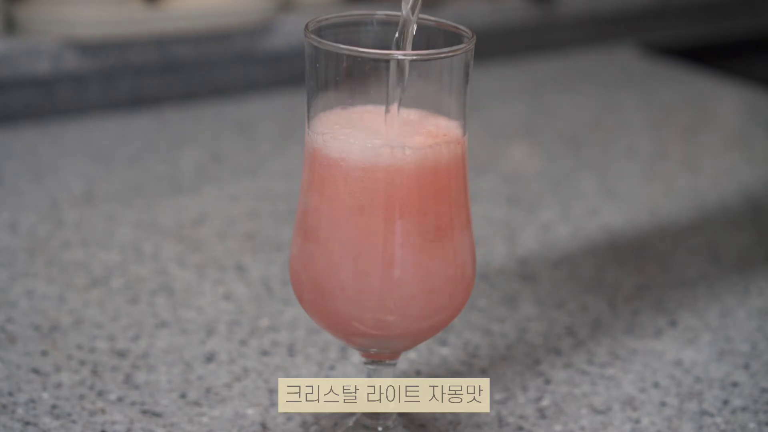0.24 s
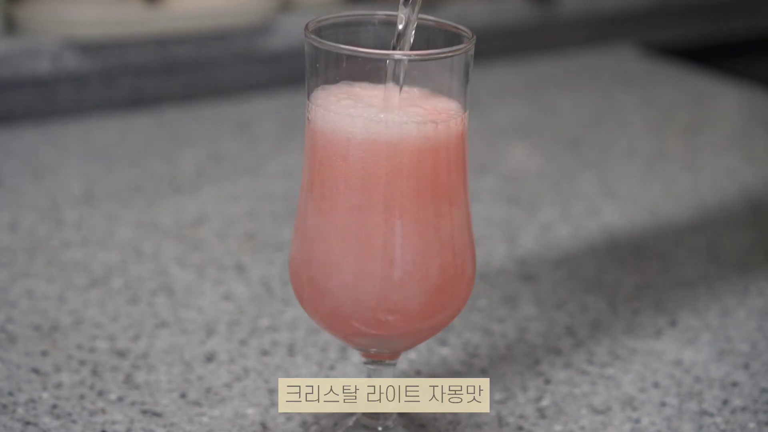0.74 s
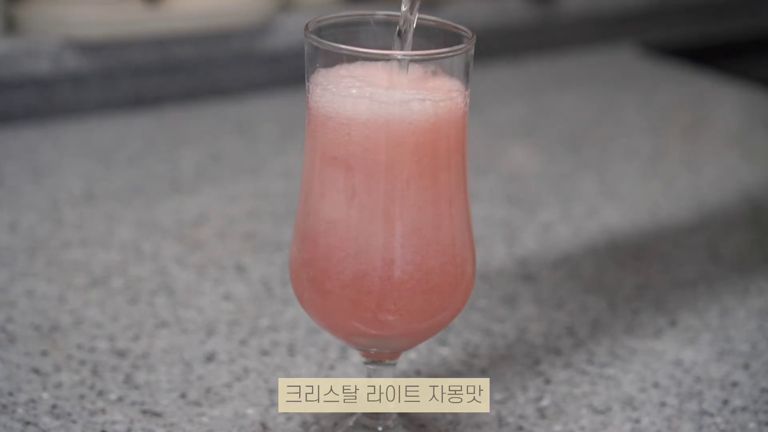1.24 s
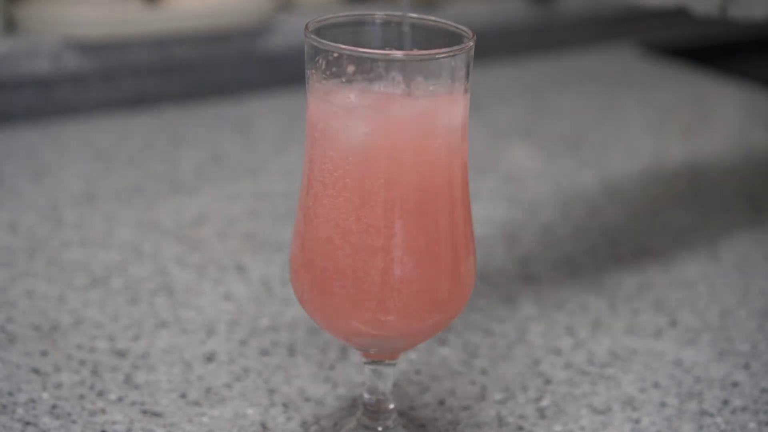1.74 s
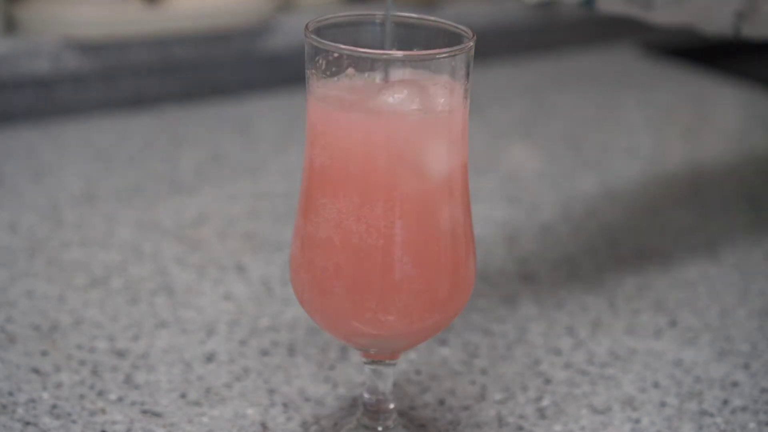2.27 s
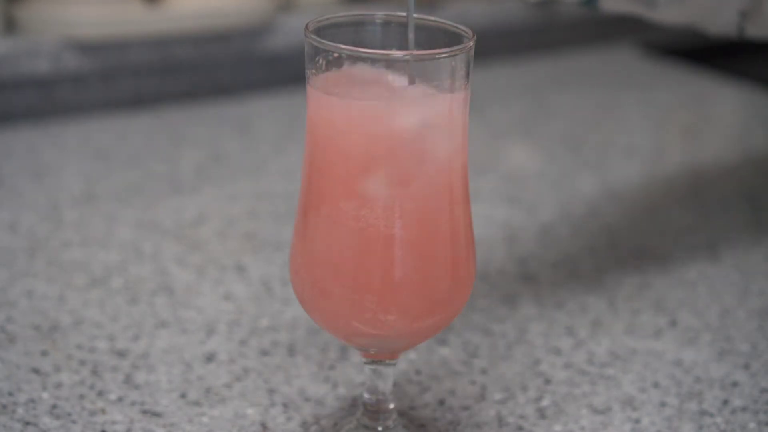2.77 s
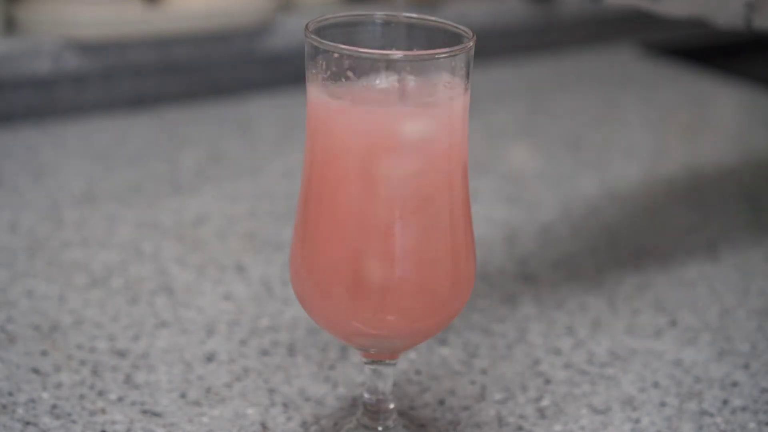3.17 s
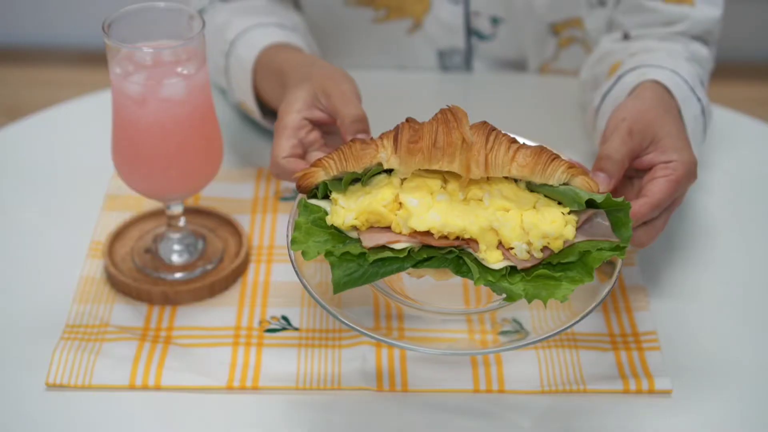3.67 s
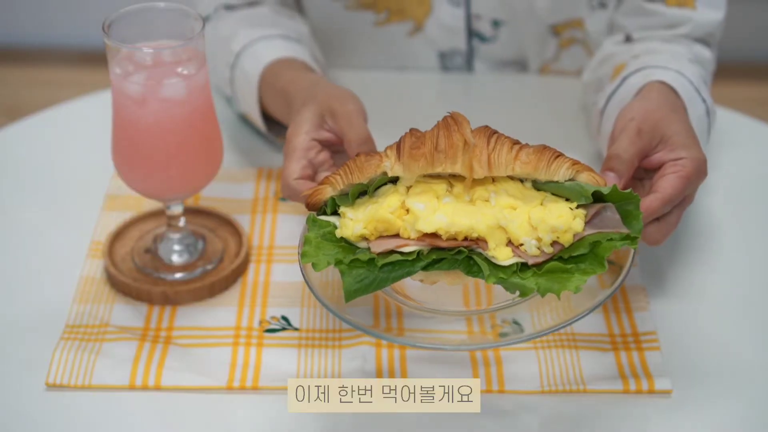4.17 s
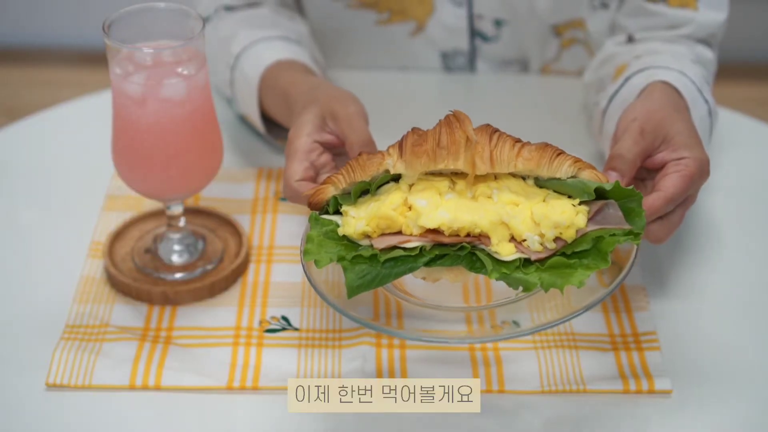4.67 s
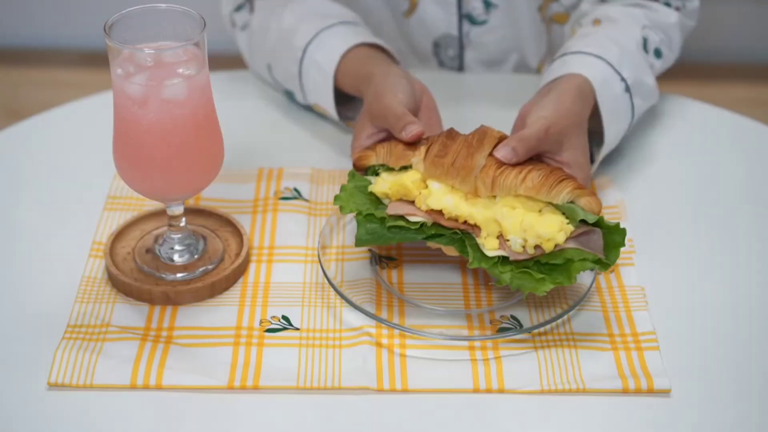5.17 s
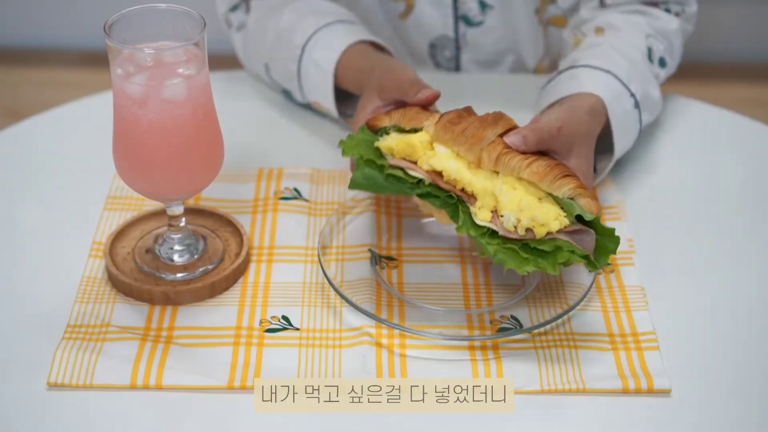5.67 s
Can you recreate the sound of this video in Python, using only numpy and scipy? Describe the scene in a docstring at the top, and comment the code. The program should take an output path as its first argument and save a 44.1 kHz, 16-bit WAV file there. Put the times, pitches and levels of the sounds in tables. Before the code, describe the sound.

Close bubbly drink fizzing, last drops plopping, ice cubes knocking dully on glass while stirred, then suddenly a hushed room with faint hum.

```python
"""A kitchen, close to a tall glass: the last of a fizzy drink plops in, bubbles hiss in the air column above the foam.
Ice nudges the wall; a spoon stirs, cubes knock dully on each other and on the glass, and the drink sloshes and gurgles.
Clicks and noise bursts ring damped resonances; ringing tones make the plops; shaped noise makes slosh and room.
The scene cuts to a quiet dining room: shaped noise with narrow peaks, a fading mains hum of two sines, a faint rustle."""
import sys
import numpy as np
from scipy import signal
from scipy.fft import rfft, irfft, next_fast_len
from scipy.io import wavfile
from scipy.ndimage import uniform_filter1d

SR = 44100
rng = np.random.default_rng(int(sys.argv[2]) if len(sys.argv) > 2 else 0)


def persist_wave(psi):
    """Save psi, clipped to +-1, as 16-bit WAV."""
    counts = np.round(np.clip(psi, -1, 1) * 32767).astype(np.int16)
    wavfile.write(sys.argv[1], SR, np.atleast_2d(counts).T)


N = 261072
TIME_S = np.arange(N) / SR

# Air column above the drink, nearly odd modes: multiple, width_hz, level_db (relative)
COLUMN_MODES = [(1, 350, 0), (2.9, 1300, -3), (4.85, 1600, -4), (7.3, 1800, -9), (9.9, 1500, -11)]
# Plain hiss between the column modes: frequency_hz, density_db (relative, per Hz)
FIZZ_BED_SPECTRUM = [(880, -39), (1500, -7), (3030, -16), (4460, 1), (7690, -9), (16000, -63)]
FIZZ_DB = -52
COLUMN_HZ, COLUMN_STIRRED_HZ, SPOON_IN_S = 1500, 1530, 1.53   # quarter-wave pitch before and after the spoon

# Kitchen room noise: frequency_hz, density_db (relative, per Hz)
KITCHEN_SPECTRUM = [(12, -49), (20, -8.5), (54, -4), (73, 3), (119, 0), (209, -7), (445, -6.5),
                    (835, -12.5), (1600, -14.5), (3000, -16), (3900, -46.5), (6600, -120)]
# Left-right likeness of kitchen noise: frequency_hz, likeness (0 to 1)
KITCHEN_LIKENESS = [(60, 1), (240, 0.76), (950, 0.16), (3770, 0.5), (15000, 0.16)]
# Kitchen reverberation: frequency_hz, t60_s
ECHO_DECAY = [(400, 0.15), (1500, 0.39), (5000, 0.22), (14000, 0.27)]
KITCHEN_DB = -56.5

# Bubbles trapped by the last of the stream: start_s, peak_db, pitch_hz
PLOP_EVENTS = [(0.019, -39, 1350), (0.041, -35.5, 1270), (0.086, -42, 1540), (0.139, -47, 818),
               (0.144, -45, 990), (0.178, -49, 865), (0.188, -39, 1600)]
POUR_END_S, PATTER_DB = 0.23, -56.5
PLOP_CYCLES = 10   # cycles in which a plop falls by 30 dB

# Knocks of ice: start_s, body_hz, body_peak_db, clink_hz, clink_peak_db, crack_peak_db, spike_over_tail_db
KNOCK_EVENTS = [(0.91, 1510, -36.5, 4330, -38.5, -43, 3), (1.07, 1620, -30, 4770, -25.5, -36, 11),
                (1.212, 1380, -28, 6650, -28, -46, 20), (1.229, 1240, -30.5, 4760, -15.5, -22, 15),
                (1.252, 1900, -35, 4860, -25, -22, 9), (1.367, 1380, -25.5, 3880, -35, -54, 8),
                (1.502, 1320, -33.5, 6460, -30.5, -45, -12), (1.5485, 1844, -7, 3280, -17, -16, 0),
                (1.5565, 1860, -21.5, 6500, -8, -8.5, 13.5), (1.615, 1820, -25, 6090, -22, -15, 10),
                (1.658, 1820, -19.5, 3800, -20.5, -20, -9), (1.676, 1780, -22.5, 4780, -14.5, -21, 8),
                (1.72, 2360, -28.5, 3560, -34, -35, 6), (1.752, 1900, -10.5, 4660, -3, 1, 26),
                (1.78, 1960, -22, 3850, -29, -28, 16), (1.8, 1940, -12, 5650, -7.5, -21, 15),
                (1.821, 1930, -11.5, 4860, -11, -8.5, 4), (1.909, 1750, -24.5, 3880, -25.5, -36, -6),
                (1.916, 1360, -19, 5930, -14.5, -7, 2), (1.939, 1650, -31, 7250, -22, -15.5, -5),
                (1.992, 1960, -23, 4150, -40, -48, -3), (2.026, 1970, -12.5, 4720, -2, -17.5, 27),
                (2.048, 1970, -20, 4100, -32, -46, -14), (2.065, 1960, -21, 3510, -18.5, -24.5, 3),
                (2.083, 2260, -8, 4120, -12, -14, 6), (2.129, 905, -17, 3550, -14.5, -20, -16),
                (2.189, 1450, -20, 3850, -13, -16, 20), (2.202, 1680, -10.5, 3600, -17, -42, 17),
                (2.308, 1710, -11.5, 4100, -14, -17, 12.5), (2.33, 1280, -12, 3870, -6, -6.5, 23),
                (2.357, 1960, -18, 3750, -13, -25, 14), (2.365, 1650, -6, 3850, -6.5, -11, 15.5),
                (2.425, 1760, -15.5, 3490, -20, -29, 1), (2.447, 1430, -11, 3540, -11, -9.5, 5.5),
                (2.472, 1560, -25, 3960, -22, -35, 2), (2.504, 1620, -14.5, 4000, -13, -33, 20.5),
                (2.553, 2040, -26.5, 4000, -25.5, -23.5, 3), (2.576, 1670, -22, 4390, -14.5, -18.5, 11),
                (2.598, 1620, -14.5, 5130, -11.5, -24, 2), (2.619, 1170, -13.5, 5300, -16.5, -5, 12),
                (2.627, 1120, -24, 5300, -15, -14, 13), (2.643, 1940, -23, 6080, -19.5, -23, 10.5),
                (2.653, 1610, -19.5, 4940, -20, -30, -13), (2.676, 1500, -14, 3930, -17.5, -34, 6),
                (2.682, 1520, -13.5, 3770, -17, -38, 8), (2.745, 1570, -15.5, 4230, -13.5, -15, -13),
                (2.765, 1810, -15, 3740, -27, -31, -25), (2.785, 2210, -18, 3800, -21, -33, 15),
                (2.808, 1600, -20, 3900, -22, -26, 5), (2.863, 1510, -8.5, 4330, -6, -10, 11.5),
                (2.884, 1880, -14, 4400, -35, -29, 0), (2.918, 1650, -20.5, 5700, -27.5, -32, -3),
                (2.958, 1670, -13, 3900, -26.5, -41, -20), (2.965, 2200, -20, 3940, -13, -26.5, 12),
                (2.978, 1810, -18.5, 3960, -23, -23, -6), (2.987, 2000, -23.5, 3940, -22, -27, 11),
                (3.006, 2115, -10.5, 3920, -8, -20.5, -23), (3.047, 1280, -21.5, 3900, -24, -36, -10),
                (3.061, 1950, -17, 3870, -13, -26, 17), (3.082, 1850, -14.5, 3970, -26, -38, -2),
                (3.103, 2010, -18, 3930, -29.5, -37, 2), (3.153, 1710, -16, 5320, -16, -11.5, 17),
                (3.165, 1640, -10, 3940, -11, -16, 3), (3.243, 1420, -18, 3890, -34, -41, -13),
                (3.257, 1990, -11, 3770, -9.5, -20, 20), (3.286, 1900, -26.5, 3830, -17.5, -24, -4.5),
                (3.392, 1450, -14.5, 3820, -13, -23, -12), (3.407, 1820, -12.5, 4540, -21, -31, -4),
                (3.417, 1586, -14.5, 3980, -17.5, -37, 1), (3.434, 1550, -18.5, 3600, -37, -35, -14),
                (3.464, 2000, -25, 4480, -11, -13, 6), (3.472, 2070, -10, 4150, -11, -24.5, -3),
                (3.49, 1470, -17, 4790, -19.5, -19, 2), (3.508, 1620, -17.5, 3900, -27, -35, 4),
                (3.553, 2260, -25.5, 3920, -25, -47, -18), (3.567, 1460, -23, 3830, -28, -39, -22),
                (3.602, 1480, -21, 3870, -16.5, -26, 10.5)]
# Filled glass, damped by bubbles: frequency_hz, width_hz, level_db (relative)
GLASS_MODES = [(807, 250, -9.5), (1333, 274, -3.5), (1522, 206, -0.5), (1963, 324, 1), (3910, 700, -5),
               (4720, 300, -3), (5560, 630, -3), (5820, 610, 0), (7310, 1000, -1), (8040, 1100, -1),
               (9000, 2300, -3.5), (12000, 140, -18), (13040, 160, -4), (16500, 870, -27)]
THUMP_DB = -28   # relative to the body of the knock
CLINK_T60_S = 0.015

# Resonant gurgles of liquid: time_s, upper_hz, upper_db, low_db
GURGLE_COURSE = [(1.0, 440, -67.5, -82), (1.25, 435, -51.5, -93), (1.5, 451, -59.5, -63),
                 (1.6, 586, -48.5, -68), (1.95, 605, -61.5, -71), (2.15, 606, -36, -50),
                 (2.27, 618, -55.5, -66.5), (2.6, 623, -54, -65), (3.1, 599, -74, -53.5),
                 (3.4, 582, -86, -60.5), (3.66, 581, -80, -57)]

# Swells of rattle and slosh while the spoon stirs; one stroke may hold several:
# start_s, length_s, rattle_db, slosh_db
STIR_SWELLS = [(1.552, 0.072, -35.5, -52), (1.75, 0.1, -35, -44), (1.915, 0.077, -47, -56),
               (1.987, 0.083, -37, -58), (2.06, 0.1, -32.5, -42.5), (2.326, 0.18, -34.5, -45),
               (2.57, 0.24, -36, -47), (2.849, 0.18, -37, -50.5), (3.162, 0.026, -33.5, -69),
               (3.239, 0.085, -34, -55), (3.38, 0.055, -31, -61), (3.45, 0.057, -37.5, -41),
               (3.54, 0.074, -43, -58)]
# Slosh of liquid: frequency_hz, density_db (relative, per Hz)
SLOSH_SPECTRUM = [(71, -17), (120, -7), (167, -27.5), (270, -5.5), (356, -19.5), (813, -3.5), (900, -6.5),
                  (1170, -17), (1980, -120)]
SWELL_RISE_DB_PER_S, RATTLE_FALL_DB_PER_S, SLOSH_FALL_DB_PER_S = 900, 263, 276
SLOSH_LAG_S = 0.023
# Ice adrift between swells comes up to these levels by BOBBING_FROM_S
BOBBING_RATTLE_DB, BOBBING_SLOSH_DB, BOBBING_FROM_S = -58.5, -62.5, 1

# Dining room noise: frequency_hz, density_db (relative, per Hz)
DINING_SPECTRUM = [(12, -64), (20, -10), (48, -14.5), (91, -6), (123, -6), (146, -11.5), (172, -8.5),
                   (446, -17.5), (485, -13.5), (624, -15.5), (1060, -15), (1330, -16.5), (3250, -26),
                   (13900, -32.5), (16000, -34)]
# Left-right likeness of dining room noise: frequency_hz, likeness (0 to 1)
DINING_LIKENESS = [(60, 1), (240, 0.58), (950, 0.31), (3770, 0.097), (15000, 0.24)]
# Resonances in the dining room noise: frequency_hz, width_hz, level_db (relative to that noise)
DINING_RESONANCES = [(468, 16, -14), (969, 39, -15), (1550, 120, -11.5), (2740, 36, -18.5)]
# Mains hum: frequency_hz, rms_db (at 4 s)
HUM_TONES = [(59.2, -63), (118.4, -63.5)]
# Change of each hum tone: slope_db_per_s
HUM_SLOPES = [-4.5, -2]
# Faint rustle, before its random flutter: time_s, level_db
RUSTLE_COURSE = [(3.66, -81), (5.35, -77), (5.62, -60.5), (5.92, -69)]
DINING_DB = -57.5

CUT_S, CUT_FADE_S = 3.645, 0.016
PEAK_CEILING = 0.72   # height at which peaks are rounded
CUTOFF_HZ = 16600   # from here up the treble is at least 60 dB down


def from_db(db):
    """Decibels to amplitude."""
    return 10 ** (np.asarray(db) / 20)


def rms_one(x):
    """Scale to an rms of 1 over all channels."""
    return x / np.sqrt(np.mean(x ** 2) + 1e-20)


def in_time(rows):
    """Spread the columns of a timed table over every sample."""
    times_s, *columns = np.transpose(rows)
    return [np.interp(TIME_S, times_s, column) for column in columns]


def at_hz(points, hz):
    """Read a table of frequencies, interpolating on a log scale."""
    table_hz, values = np.transpose(points)
    return np.interp(np.log(hz), np.log(table_hz), values)


def band(x, low_hz, high_hz):
    """Butterworth band-pass."""
    sections = signal.butter(2, [low_hz, high_hz], "band", fs=SR, output="sos")
    return signal.sosfilt(sections, x)


def resonance(x, hz, width_hz):
    """Two-pole resonance with a peak gain of about 1."""
    radius = np.exp(-np.pi * width_hz / SR)
    zeros = np.array([1, 0, -1]) * (1 - radius ** 2) / 2
    poles = [1, -2 * radius * np.cos(2 * np.pi * hz / SR), radius ** 2]
    return signal.lfilter(zeros, poles, x + 1e-18)


def drift(rate_hz):
    """Slow random wander between normal random values of spread 1."""
    values = rng.standard_normal(int(N / SR * rate_hz) + 2)
    return np.interp(TIME_S * rate_hz, np.arange(len(values)), values)


def room_noise(spectrum, likeness):
    """Stereo noise of a given spectrum, from a shared and an opposed part; rms 1."""
    hz = np.maximum(np.arange(N // 2 + 1) * SR / N, 1)
    mid, side = rfft(rng.standard_normal((2, N)))
    alike = np.clip(at_hz(likeness, hz), 0, 1)
    opposed = np.sqrt(1 - alike) * side * [[1], [-1]]
    stereo = np.sqrt(1 + alike) * mid + opposed
    return rms_one(irfft(stereo * from_db(at_hz(spectrum, hz)), N))


def grains(per_s, spread_db):
    """Random clicks of uneven size and sign."""
    excess = np.minimum(rng.exponential(1, N), 4)
    sizes = from_db(spread_db * excess) * rng.choice([-1, 1], N)
    return sizes * (rng.random(N) < per_s / SR)


def fizz():
    """Thousands of bursting bubbles a second sound the air column, pitched higher once spoon and ice raise the drink."""
    pitch_hz = np.where(TIME_S < SPOON_IN_S, COLUMN_HZ, COLUMN_STIRRED_HZ)
    pops = np.array([grains(9000, 2.5) for _ in range(3)])
    pops = rms_one(pops[0] + 1.06 * pops[1:])   # partly the same at both sides
    column, hop = np.zeros((2, N)), 4096
    window = np.hanning(2 * hop)
    pops[:, :hop] /= window[:hop] + 1e-9   # the first block has no earlier one to overlap
    for at in range(0, N, hop):   # overlapping blocks, each at its own pitch
        piece = pops[:, at:at + 2 * hop] * window[:N - at]
        for multiple, width_hz, db in COLUMN_MODES:
            mode = resonance(piece, multiple * pitch_hz[at], width_hz)
            column[:, at:at + 2 * hop] += from_db(db) * mode
    bed = from_db(-11) * room_noise(FIZZ_BED_SPECTRUM, KITCHEN_LIKENESS)
    return from_db(FIZZ_DB) * (rms_one(column) + bed)


def kitchen_air():
    """Steady kitchen room noise, shaped in spectrum and stereo likeness."""
    return from_db(KITCHEN_DB) * room_noise(KITCHEN_SPECTRUM, KITCHEN_LIKENESS)


def plops():
    """Bubbles trapped by the falling stream ring a few cycles each: some stand out, many small ones patter below."""
    pitches_hz = np.geomspace(500, 1700, num=6)
    patter = rms_one(sum(resonance(grains(60, 1.5), hz, hz / 9) for hz in pitches_hz))
    out = from_db(PATTER_DB) * patter * np.clip((POUR_END_S - TIME_S) / 0.034, 0, 1)
    for start_s, db, hz in PLOP_EVENTS:
        cycles = np.maximum(TIME_S - start_s, 0) * hz
        out += from_db(db - 30 * cycles / PLOP_CYCLES) * np.sin(2 * np.pi * cycles)
    return out


def kitchen_echo(x):
    """A dense noise tail for each side, more alike in the bass, each band dying at its own rate."""
    t = np.arange(SR // 2) / SR
    edges_hz = np.geomspace(200, 16000, num=9)
    tail = 0
    for low, high in zip(edges_hz, edges_hz[1:]):
        noise = rng.standard_normal((3, len(t)))
        shared = 2500 / low   # power of the part common to both sides
        stereo = band(np.sqrt(shared) * noise[0] + noise[1:], low, high) / np.sqrt(1 + shared)
        t60_s = at_hz(ECHO_DECAY, np.sqrt(low * high))
        tail = tail + stereo * from_db(-60 * t / t60_s)
    tail = tail * np.clip(t / 0.00064, 0, 1)
    tail = tail / np.sqrt(np.sum(tail[0] ** 2))
    size = next_fast_len(N + len(t))
    return irfft(rfft(x, size) * rfft(tail, size), size)[:, :N]


def glass(x):
    """The damped modes of the filled glass, with a little of the direct contact noise."""
    out = from_db(-47) * x
    for k, (hz, width_hz, db) in enumerate(GLASS_MODES):
        out = out + (-1) ** k * from_db(db) * resonance(x, hz, width_hz)
    return out


def knocks():
    """A sharp contact with a rough tail starts a dull body ring, a clink of the wall, a crack and a low thump."""
    start_s, body_hz, body_db, clink_hz, clink_db, crack_db, sharp_db = np.transpose(KNOCK_EVENTS)
    t = np.arange(1800) / SR
    noise = rng.standard_normal((2, len(start_s), len(t)))   # mid and side
    mid = noise[0]
    # a clean hit opens with a spike, a glancing one smears
    spike = from_db(sharp_db[:, None] - 60 * t / 0.0008)
    rough_tail = glass(noise * from_db(-60 * t / 0.057))
    struck = rough_tail + band(noise * spike, 500, 13900) * from_db(-5.5)

    def part(low_hz, high_hz, burst_t60_s, side_db, peak_db, ring_hz, ring_t60_s, ring_db):
        """One band of the contact noise plus a ringing mode, scaled to its peak level."""
        burst = band(struck, low_hz, high_hz) * from_db(-60 * t / burst_t60_s)
        burst = burst / np.abs(burst[0]).max(axis=1, keepdims=True)
        width_hz = np.log(1000) / (np.pi * ring_t60_s)
        push = mid * from_db(-60 * t / 0.0067)
        ring = np.array([resonance(p, hz, width_hz) for p, hz in zip(push, ring_hz)])
        ring = ring / np.abs(ring).max(axis=1, keepdims=True)
        center = burst[0] + from_db(ring_db - 0.25 * sharp_db[:, None]) * ring
        # the wall radiates unevenly to either side
        stereo = center + from_db(side_db) * burst[1] * [[[1]], [[-1]]]
        return stereo / np.abs(stereo).max(axis=(0, 2), keepdims=True) * from_db(peak_db)[:, None]

    crack_hz = np.full(len(start_s), 8100.)
    hits = part(695, 2390, 0.11, -10.0, body_db, body_hz, 0.022, 0.27)
    hits = hits + part(2950, 5460, 0.14, -6.5, clink_db, clink_hz, CLINK_T60_S, -2.5)
    hits = hits + part(8100, 17650, 0.1, -4, crack_db, crack_hz, 0.0028, -2.5)
    thump = band(mid * from_db(-60 * t / 0.072), 108, 834)   # the cube shoves the liquid
    thump = thump / np.abs(thump).max(axis=1, keepdims=True)
    hits = hits + thump * from_db(body_db + THUMP_DB)[:, None]
    out = np.zeros((2, N + len(t)))
    for k, at in enumerate(np.round(start_s * SR).astype(int)):
        out[:, at:at + len(t)] += hits[:, k]
    return out[:, :N]


def gurgle():
    """Air pockets in the moving liquid ring a few cycles: one pitch wanders, a low one stays."""
    upper_hz, upper_db, low_db = in_time(GURGLE_COURSE)
    # rings at 500 Hz are shifted down to 0 Hz, smoothed, then carried up to the wandering pitch
    flutter = resonance(grains(900, 2.0), 500, 45) * np.exp(-2j * np.pi * 500 * TIME_S)
    envelope = uniform_filter1d(flutter.real, size=120)
    upper = np.real(envelope * np.exp(2j * np.pi * np.cumsum(upper_hz) / SR))
    low = resonance(resonance(grains(200, 2.5), 272, 70), 272, 70)
    on = TIME_S > GURGLE_COURSE[0][0]
    return on * (from_db(upper_db) * rms_one(upper) + from_db(low_db) * rms_one(low))


def swell_level_db(column, lag_s, fall_db_per_s, adrift_db):
    """Each swell rises fast, holds and dies away, over the level of drifting ice."""
    level_db = adrift_db - 40 * np.clip(BOBBING_FROM_S - TIME_S, 0, 1)
    for row in STIR_SWELLS:
        start_s = row[0] + lag_s
        end_s = start_s + row[1]
        rise_db = SWELL_RISE_DB_PER_S * np.maximum(start_s - TIME_S, 0)
        fall_db = fall_db_per_s * np.maximum(TIME_S - end_s, 0)
        level_db = np.maximum(level_db, row[column] - rise_db - fall_db)
    return level_db


def rattle():
    """Many small, soft touches of ice between the knocks, heard mostly in the low modes of the glass."""
    level_db = swell_level_db(2, 0, RATTLE_FALL_DB_PER_S, BOBBING_RATTLE_DB)
    clicks = grains(700 * from_db(4 * drift(30)), 3.5)
    touches = signal.lfilter([1], [1, -0.8], clicks)   # softened
    return from_db(level_db) * rms_one(band(glass(touches), 420, 4340))


def slosh():
    """Liquid swells a little later than the rattle: low noise with a lapping level."""
    level_db = swell_level_db(3, SLOSH_LAG_S, SLOSH_FALL_DB_PER_S, BOBBING_SLOSH_DB)
    lapping_db = 3 * drift(25)
    return from_db(level_db + lapping_db) * room_noise(SLOSH_SPECTRUM, [(100, 0.98), (900, 0.88)])


def mains_hum():
    """Two steady sines that weaken over time."""
    out = 0
    for (hz, rms_db), slope_db_per_s in zip(HUM_TONES, HUM_SLOPES):
        level_db = rms_db + slope_db_per_s * (TIME_S - 4.0)
        out = out + np.sqrt(2) * from_db(level_db) * np.sin(2 * np.pi * hz * TIME_S)
    return out


def rustle():
    """Faint noise through two resonances near 1 kHz, its level fluttering at random."""
    level_db, = in_time(RUSTLE_COURSE)
    noise = resonance(resonance(rng.standard_normal((2, N)), 1060, 250), 1000, 400)
    return from_db(level_db + 3.8 * drift(30)) * rms_one(noise)


def dining_room():
    """Room noise with narrow resonances, a fading mains hum and a faint rustle."""
    air = rng.standard_normal((2, N))
    peaks = sum(from_db(db) * rms_one(resonance(air, hz, width_hz)) for hz, width_hz, db in DINING_RESONANCES)
    room = from_db(DINING_DB) * (room_noise(DINING_SPECTRUM, DINING_LIKENESS) + peaks)
    return room + mains_hum() + rustle()


def scene():
    """Kitchen until the cut, dining room after it."""
    in_glass = plops() + knocks() + gurgle() + rattle()
    direct = in_glass * from_db([[0.15], [-0.15]])   # a touch stronger at the left
    echo = from_db(-10) * kitchen_echo(in_glass.mean(axis=0))
    kitchen = fizz() + kitchen_air() + direct + echo + slosh()
    after = np.clip((TIME_S - CUT_S) / CUT_FADE_S + 0.5, 0, 1)
    return kitchen * (1 - after) + dining_room() * after


def record(dry):
    """At the microphones: peaks are rounded, then the top is cut steeply."""
    rounded = PEAK_CEILING * np.tanh(dry / PEAK_CEILING)
    return signal.sosfilt(signal.cheby2(14, 60, CUTOFF_HZ, fs=SR, output="sos"), rounded)


dry = scene()
out = record(dry)
persist_wave(out)
```